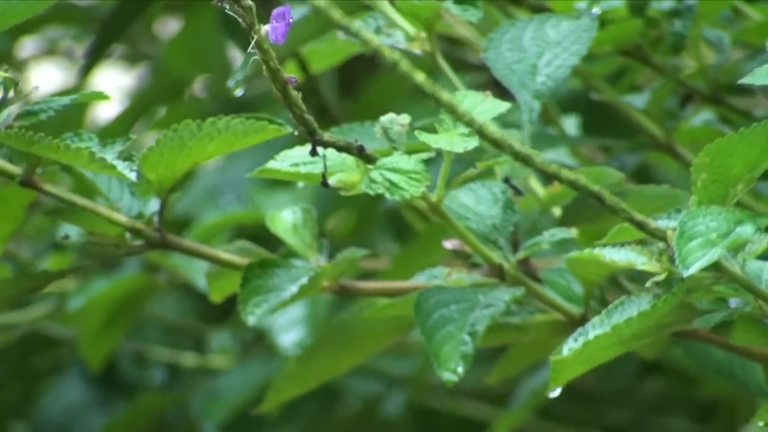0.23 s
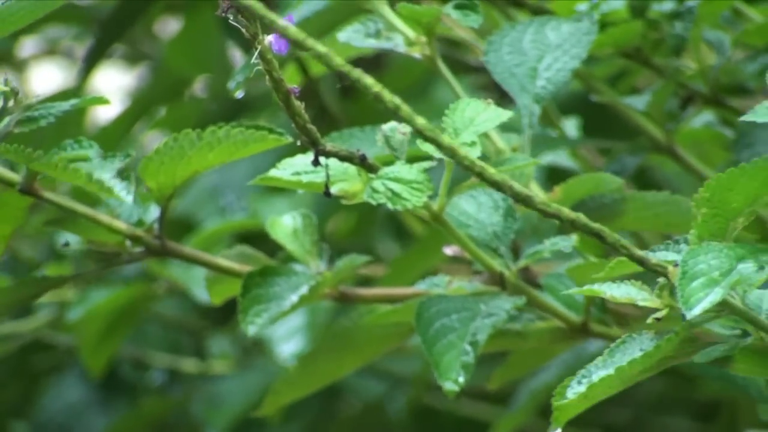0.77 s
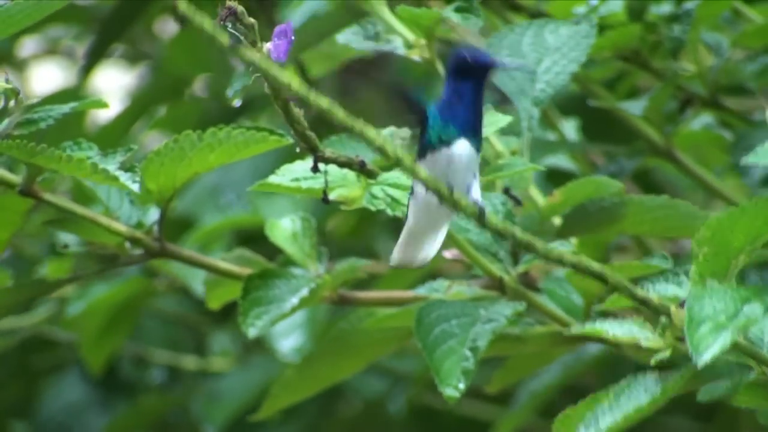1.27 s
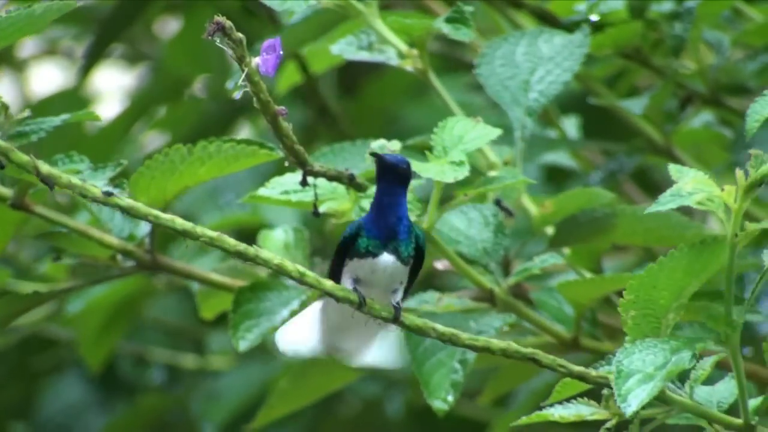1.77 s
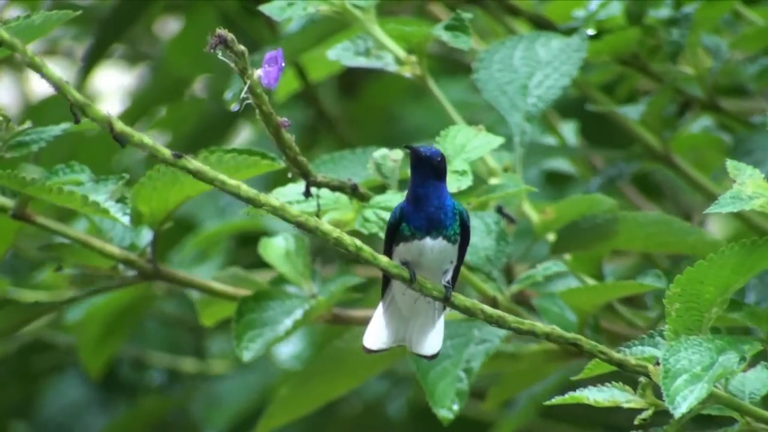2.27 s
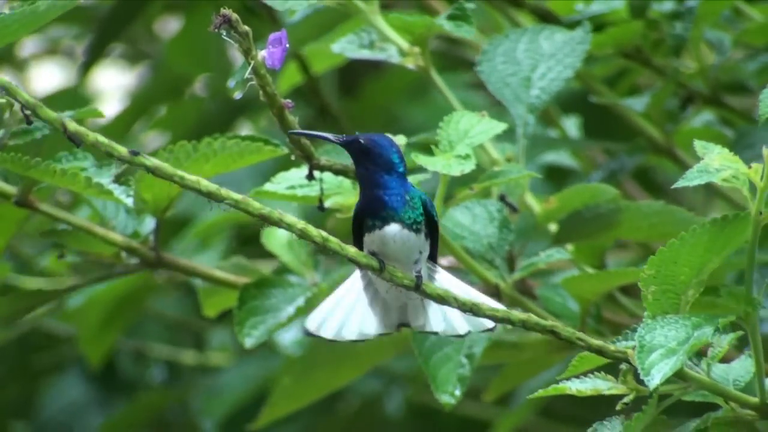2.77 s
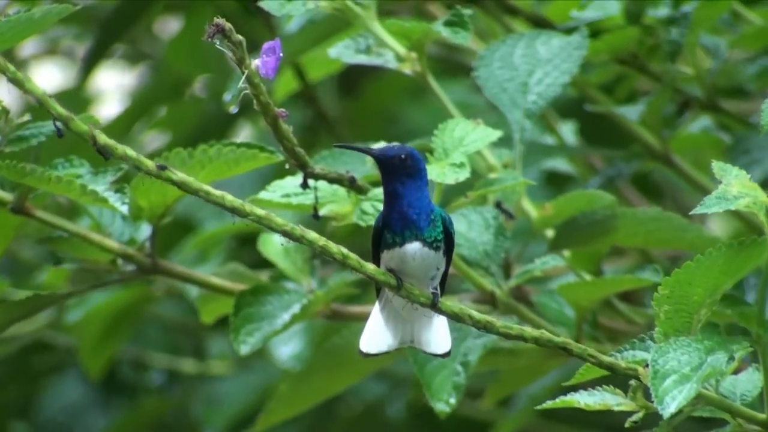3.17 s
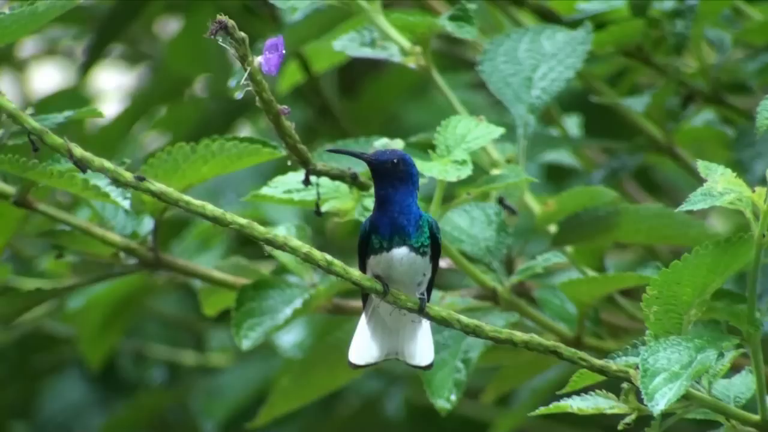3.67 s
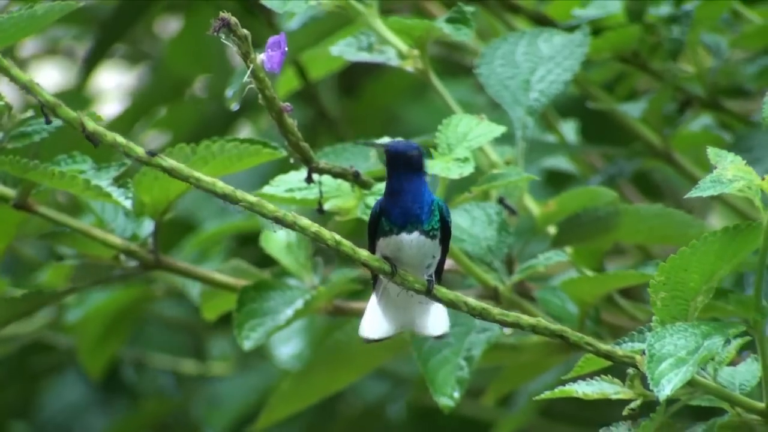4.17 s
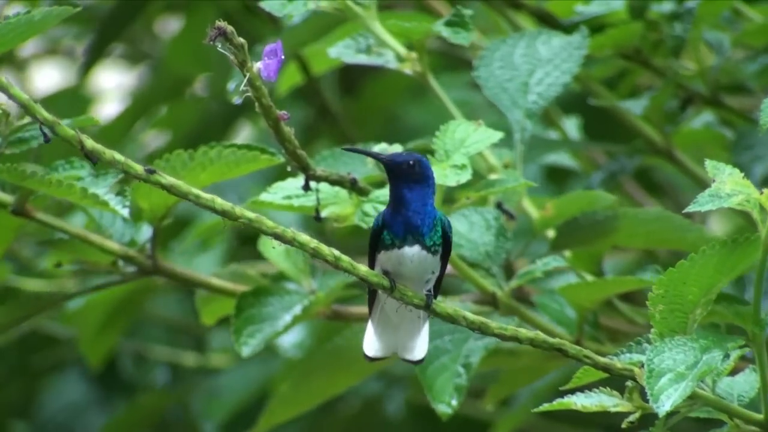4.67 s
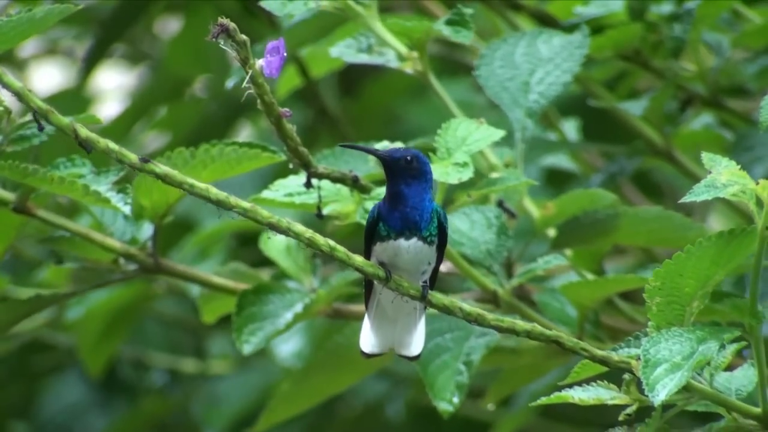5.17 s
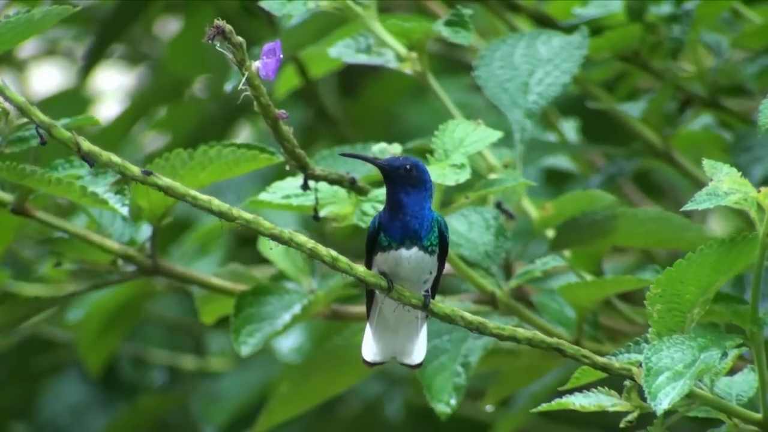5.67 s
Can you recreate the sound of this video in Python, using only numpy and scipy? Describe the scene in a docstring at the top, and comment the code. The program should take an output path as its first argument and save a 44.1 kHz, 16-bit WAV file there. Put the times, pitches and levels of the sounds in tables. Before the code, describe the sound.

Steady rain falls on dense forest foliage for about six seconds, heard from one microphone among the trees. Distant drops merge into a soft, even wash, while nearer ones tap wet leaves and tick close by, over a barely audible low hum. Heavier drips splash and plop irregularly, most clearly at the start and around 1.3, 1.8, 3.0, 3.9 and 4.6 seconds. Far away, small birds give faint, short rising chirps throughout, with a few thin, very high calls and tiny pips. At about 1.9 seconds one bird gives a clearer, brief whistle that arches up and falls. A single sharp, bright chip comes at 4.9 seconds, followed by two more arched whistles at about 5.0 and 5.6 seconds. Trunks and leaves give every call a short, diffuse echo. The rain swells and eases only slightly and continues to the end.

```python
"""Steady rain on dense forest foliage, from one microphone among the trees. Far drops merge into a
soft wash; nearer ones tap the wet leaves and tick close by. Heavy drips splash on leaves or plop lower
down, over a very faint low hum. Small birds chirp from deep in the forest, one bird gives three arched
whistles, and a single sharp chip comes late. Trunks and leaves scatter and echo every call."""
import sys
import numpy as np
from scipy import signal
from scipy.io import wavfile

SR = 44100
rng = np.random.default_rng(int(sys.argv[2]) if len(sys.argv) > 2 else 0)


def int16_out(signal):
    """Quantize to a 16-bit WAV file."""
    q = np.round(np.clip(np.atleast_2d(signal).T, -1, 1) * 32767)
    wavfile.write(sys.argv[1], SR, q.astype(np.int16))


N = 261513
TIME = np.arange(N) / SR

# spectrum of the far rain: frequency_hz, relative_density_db
FAR_RAIN_SPECTRUM = [(18, -71), (30, -37), (59, -19), (173, -14), (389, -12), (432, -9.5), (996, -1),
                     (1080, -3), (1170, 1), (3070, -0.5), (4910, -9.5), (5450, -10.5), (6210, -14),
                     (8500, -17.5), (15500, -40)]
# rise and fall of the shower, before its swing is narrowed: time_s, relative_level_db
SHOWER_CONTOUR = [(0.0, -40.5), (1.67, -40), (1.82, -40), (2.58, -41.5), (3.06, -39.5), (4.38, -41.5),
                  (5.0, -40), (5.93, -42)]
# resonances of the wet leaves: centre_hz, width_hz, relative_level_db
LEAF_RESONANCES = [(1100, 570, -19.5), (3160, 230, -19.5), (4330, 210, -15.5), (5480, 440, -16),
                   (6960, 410, -17.5), (8420, 680, -23), (9500, 1300, -35), (13200, 800, -40)]

# a far bird's rising slurs: start_s, relative_level_db
RISING_SLURS = [(0.0, -50), (0.29, -48.5), (1.373, -52), (1.69, -50), (2.97, -51), (3.31, -49),
                (4.48, -49.5), (4.715, -48.5), (4.95, -50)]
# thin, very high far calls that sag a little: start_s, relative_level_db
THIN_CALLS = [(0.95, -60), (1.10, -63), (2.272, -58.5), (3.70, -63.5), (4.88, -61), (5.05, -62)]
# short far pips: start_s, relative_level_db
SHORT_PIPS = [(2.81, -53), (3.688, -48)]

# heavy drips splashing on leaves: start_s, centre_hz, width_octaves, level_db
LEAF_SPLASHES = [(0.005, 4570, .6, -46), (0.418, 10500, .4, -57), (1.07, 11500, .75, -56),
                 (1.335, 13200, .4, -57), (1.34, 4000, 1.1, -43), (1.655, 4600, 0.29, -47),
                 (1.674, 8900, .4, -51), (2.872, 7400, 0.91, -46.5), (3.036, 6300, .62, -42),
                 (3.036, 12500, 0.47, -55), (3.26, 7400, .41, -50), (4.09, 10000, .7, -54),
                 (5.206, 11200, 0.79, -50.5), (5.821, 4300, 1, -42)]
# fat drops plopping lower down: start_s, centre_hz, width_octaves, level_db
LOW_PLOPS = [(0.014, 1450, 0.21, -36), (1.04, 1700, .62, -39.5), (1.836, 1660, .4, -34),
             (2.68, 580, 0.44, -48), (3.002, 1820, .12, -38), (3.105, 2390, 0.28, -40),
             (3.910, 1600, 0.65, -33.5), (4.626, 1170, 0.86, -38), (4.727, 1720, .2, -43),
             (5.02, 1600, .23, -40)]
# droplets ticking close to the microphone: start_s, centre_hz, width_octaves, level_db
CLOSE_DROPLETS = [(0.0685, 13900, .3, -37), (3.036, 12000, .6, -41)]

# arched whistles: top_s, rise_s, fall_s, top_hz, bend (1 climbs straight, more flattens the top), level_db
ARCHED_WHISTLES = [(1.91, .095, 0.12, 2768, 2.0, -35), (5.052, .165, 0.045, 2775, 1.3, -36),
                   (5.568, .125, .11, 2663, 2.1, -34.5)]


def from_db(db):
    """Decibels to gain."""
    return 10 ** (np.asarray(db) / 20)


def unit_rms(x):
    """Scale to an rms of 1."""
    return x / np.sqrt(np.mean(x ** 2) + 1e-20)


def band(x, low_hz, high_hz, order=2):
    """Butterworth band-pass."""
    sos = signal.butter(order, [low_hz, min(high_hz, .47 * SR)], "band", fs=SR, output="sos")
    return signal.sosfilt(sos, x + 1e-18)


def drift(rate_hz):
    """Smooth random wander of spread 1."""
    hop, settle = 40, 2000
    pole = np.exp(-2 * np.pi * rate_hz * hop / SR)
    noise = rng.standard_normal(N // hop + settle + 2)
    slow = signal.lfilter([1], [1, -2 * pole, pole * pole], noise)[settle:]
    return np.interp(np.arange(N) / hop, np.arange(len(slow)), unit_rms(slow))


def tone(start_s, end_s, pitch_hz, level_db):
    """A sine that follows a pitch and a level between two moments."""
    gate = np.clip(np.minimum(TIME - start_s, end_s - TIME) / .0034, 0, 1)
    return np.sqrt(2) * gate * from_db(level_db) * np.sin(2 * np.pi * np.cumsum(pitch_hz) / SR)


def forest(x, scatter_db, t60_s, echo_s, echo_db):
    """Sound reaches the microphone directly, scattered by trunks and leaves, and as one distinct echo."""
    t = TIME[:SR]
    tail = rng.standard_normal(SR) * (1 - np.exp(-t / .0046)) * from_db(-60 * t / t60_s)
    response = from_db(scatter_db) * tail / np.linalg.norm(tail)
    response[0] += 1
    response[int(echo_s * SR)] += from_db(echo_db)
    return signal.fftconvolve(x, response / np.linalg.norm(response))[:N]


def shower_gain(mean_db, swing_share):
    """The whole shower swells and eases slightly about its mean level."""
    time_s, contour_db = np.transpose(SHOWER_CONTOUR)
    swing_db = np.interp(TIME, time_s, contour_db) - np.mean(contour_db)
    return from_db(mean_db + swing_share * swing_db)


def far_rain(flicker_db, swell_db):
    """Countless far drops merge into noise whose third-octave bands flicker; the treble swells as one."""
    frequency_hz, density_db = np.transpose(FAR_RAIN_SPECTRUM)
    edges_hz = 25 * 2 ** (np.arange(29) / 3)
    white = rng.standard_normal((2, N))   # neighbouring bands take independent noise
    swell = swell_db * drift(5.9)
    wash = np.zeros(N)
    for k, (low_hz, high_hz) in enumerate(zip(edges_hz, edges_hz[1:])):
        centre_hz = np.sqrt(low_hz * high_hz)
        level_db = np.interp(np.log(centre_hz), np.log(frequency_hz), density_db)
        level_db += flicker_db * drift(11.3) + swell * min(centre_hz / 8000, 1)
        wash += from_db(level_db) * band(white[k % 2], low_hz, high_hz)
    return unit_rms(wash)


def impacts(per_s, spread_db):
    """Drops land at random moments, many small and a few large."""
    sizes = from_db(spread_db * np.minimum(rng.exponential(1, N), 4)) * rng.choice([-1, 1], N)
    return sizes * (rng.random(N) < per_s / SR)


def leaf_patter(per_s, spread_db):
    """Nearer drops tap the leaves, which ring for a few cycles."""
    taps = np.zeros(N)
    for hz, width_hz, level_db in LEAF_RESONANCES:
        ring = band(impacts(per_s, spread_db), hz - width_hz / 2, hz + width_hz / 2, order=1)
        taps += from_db(level_db) * unit_rms(ring)
    return forest(taps, scatter_db=-5, t60_s=.33, echo_s=.021, echo_db=-20)


def close_ticks(per_s, spread_db):
    """Small drops near the microphone make dry, broad ticks."""
    ticks = band(impacts(per_s, spread_db), 1110, 2740, order=1)
    return unit_rms(band(ticks, 440, 8200))


def low_hum(pitch_hz, width_hz):
    """A narrow band of noise, heard as an unsteady low hum."""
    return unit_rms(band(rng.standard_normal(N), pitch_hz - width_hz / 2, pitch_hz + width_hz / 2))


def far_bird(calls, length_s, from_hz, to_hz, waver):
    """A small bird repeats one short quavering glide from deep in the trees."""
    song = np.zeros(N)
    quaver = 1 + waver * drift(196)
    for start_s, level_db in calls:
        progress = np.clip((TIME - start_s) / length_s, 0, 1)
        swell = np.sqrt(np.abs(np.sin(np.pi * progress)))
        pitch_hz = (from_hz + (to_hz - from_hz) * progress) * quaver
        song += swell * tone(start_s, start_s + length_s, pitch_hz, level_db)
    return forest(song, scatter_db=-1.5, t60_s=.58, echo_s=.018, echo_db=-11)


def drips(hits, rise_s, t60_s, grain_db):
    """Each drip bursts into a grainy spray, coloured by the leaf it hits and dying away in the foliage."""
    out, t = np.zeros(N + SR), TIME[:SR // 2]
    envelope = (1 - np.exp(-t / rise_s)) * from_db(-60 * t / t60_s)
    for start_s, centre_hz, width_octaves, level_db in hits:
        noise, grain = rng.standard_normal((2, len(t)))
        edge_ratio = 2 ** (width_octaves / 2)
        spray = band(noise * from_db(grain_db * grain), centre_hz / edge_ratio, centre_hz * edge_ratio)
        spray = unit_rms(band(spray, 200, 8700))   # air and leaves soak up the highest treble
        start = int(start_s * SR)
        out[start:start + len(t)] += from_db(level_db) * envelope * spray
    return out[:N]


def whistling_bird(climb_hz, fall_hz_per_s, waver, flutter_db):
    """A bird's nearly pure tone arches up and falls, loudest near its top."""
    fade_db, loud_span_hz = 7.5, 140
    song = np.zeros(N)
    quaver = 1 + waver * drift(121.6)
    for top_s, rise_s, fall_s, top_hz, bend, top_db in ARCHED_WHISTLES:
        below_top_hz = climb_hz * np.clip((top_s - TIME) / rise_s, 0, 1) ** bend
        below_top_hz += fall_hz_per_s * np.clip(TIME - top_s, 0, fall_s)
        level_db = top_db - fade_db * (1 - np.exp(-below_top_hz / loud_span_hz))
        song += tone(top_s - rise_s, top_s + fall_s, (top_hz - below_top_hz) * quaver, level_db)
    song *= from_db(flutter_db * drift(90))
    return forest(song, scatter_db=2.5, t60_s=.66, echo_s=.056, echo_db=-7)


def sharp_chip(start_s, length_s, foot_hz, top_hz, level_db, fade_db_per_s):
    """A bird's fading chip shoots up and drops back, drawn out by the trees into a bright wash."""
    age_s = np.clip(TIME - start_s, 0, length_s)
    pitch_hz = top_hz - (top_hz - foot_hz) * np.abs(2 * age_s / length_s - 1)
    chip = tone(start_s, start_s + length_s, pitch_hz, level_db - fade_db_per_s * age_s)
    return forest(chip, scatter_db=7, t60_s=.8, echo_s=.027, echo_db=-10)


def scene():
    """Rain, drips, birds and hum meet at one microphone, the same in both channels."""
    rain = from_db(-.47) * far_rain(flicker_db=1.2, swell_db=.25)
    rain += leaf_patter(per_s=500, spread_db=2)
    rain += from_db(-13) * close_ticks(per_s=130, spread_db=3.5)
    rain *= shower_gain(mean_db=-41.5, swing_share=.58)
    drops = drips(LEAF_SPLASHES, rise_s=.004, t60_s=.32, grain_db=1.5)
    drops += drips(LOW_PLOPS, rise_s=.0052, t60_s=.19, grain_db=4.5)
    drops += drips(CLOSE_DROPLETS, rise_s=.0003, t60_s=.0066, grain_db=3)
    chirps = far_bird(RISING_SLURS, length_s=.095, from_hz=3080, to_hz=3645, waver=.01794)
    chirps += far_bird(THIN_CALLS, length_s=.11, from_hz=8680, to_hz=8380, waver=.013)
    chirps += far_bird(SHORT_PIPS, length_s=.041, from_hz=5130, to_hz=5340, waver=.0092)
    whistles = whistling_bird(climb_hz=570, fall_hz_per_s=7000, waver=.008, flutter_db=3)
    chip = sharp_chip(start_s=4.886, length_s=.05, foot_hz=3650, top_hz=6100,
                      level_db=-32.5, fade_db_per_s=223)
    hum = from_db(-87) * low_hum(pitch_hz=69.4, width_hz=7)
    mono = rain + drops + from_db(1.9) * chirps + whistles + chip + hum
    return np.array([mono, mono])


def record(dry):
    """A steep low-pass takes the very top off the microphone signal."""
    cutoff_hz = 15750
    return signal.sosfilt(signal.ellip(12, .1, 80, cutoff_hz, fs=SR, output="sos"), dry)


dry = scene()
out = record(dry)
int16_out(out)
```